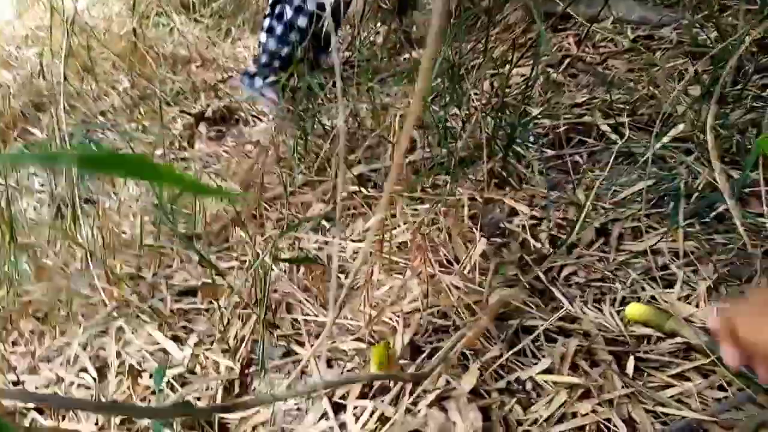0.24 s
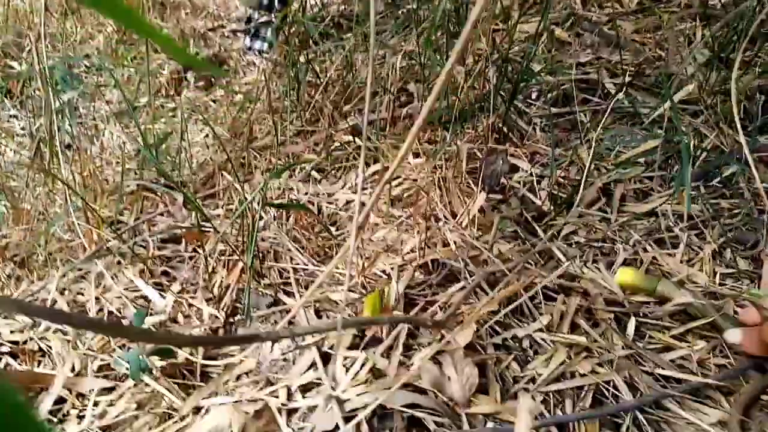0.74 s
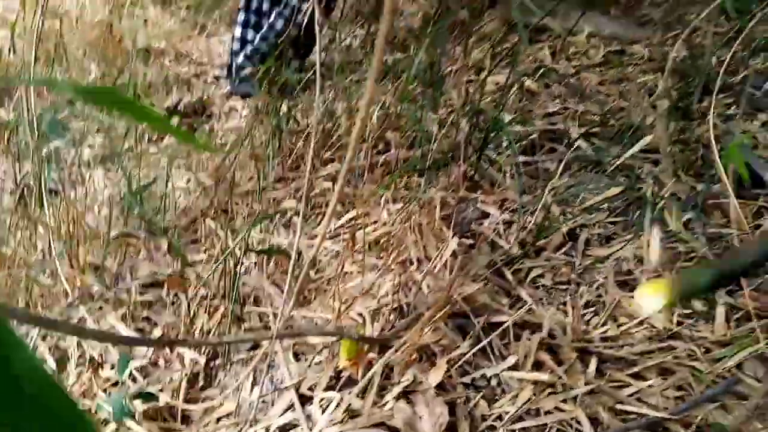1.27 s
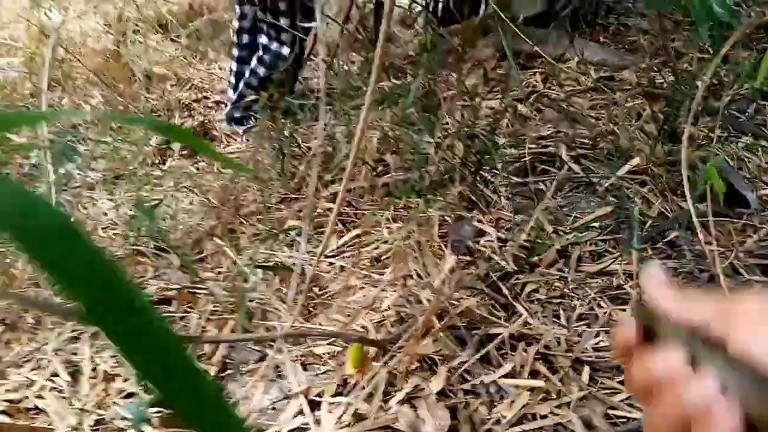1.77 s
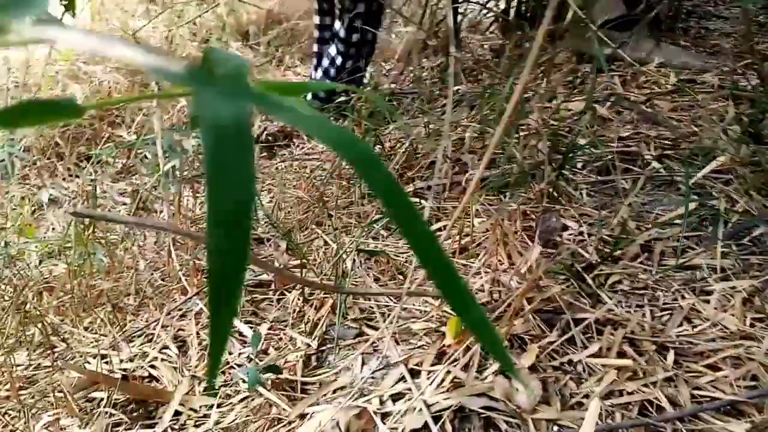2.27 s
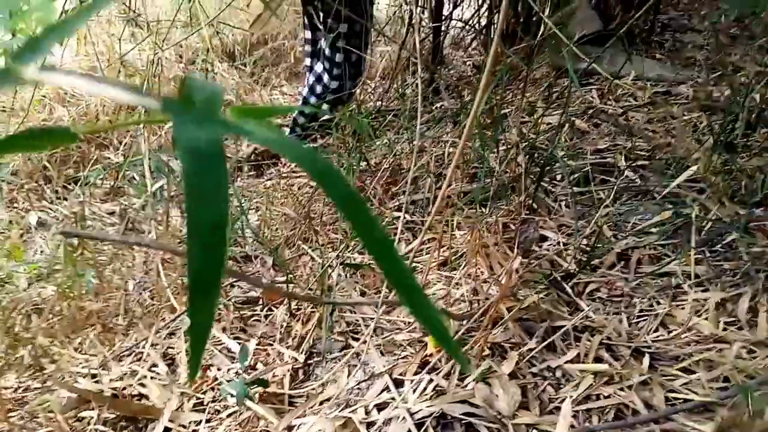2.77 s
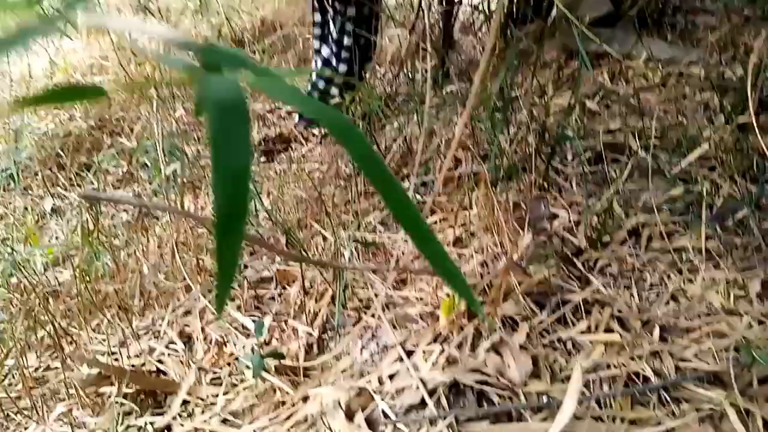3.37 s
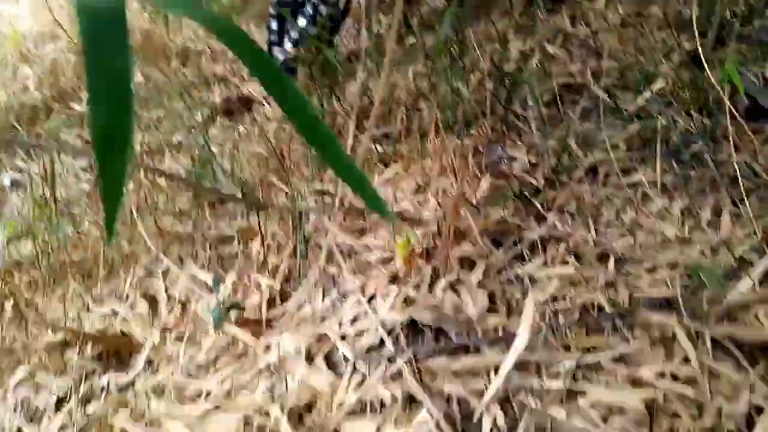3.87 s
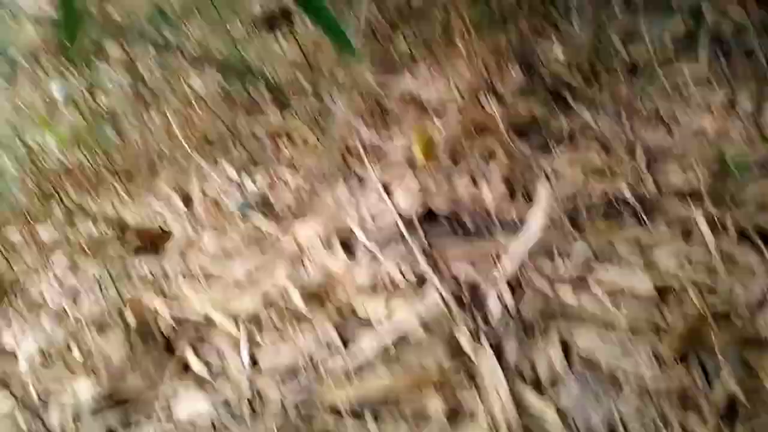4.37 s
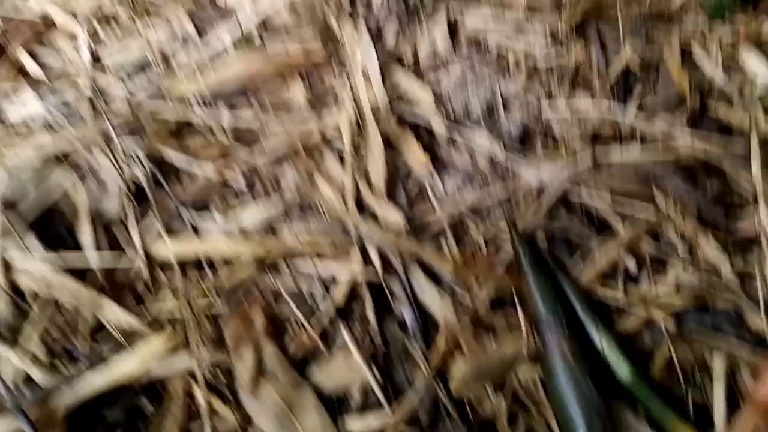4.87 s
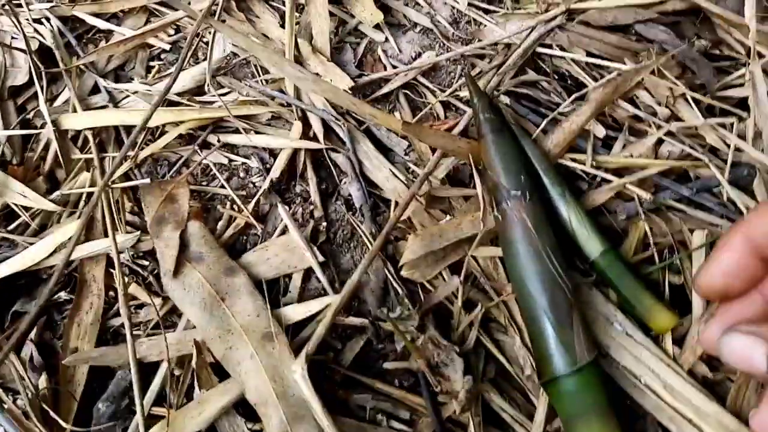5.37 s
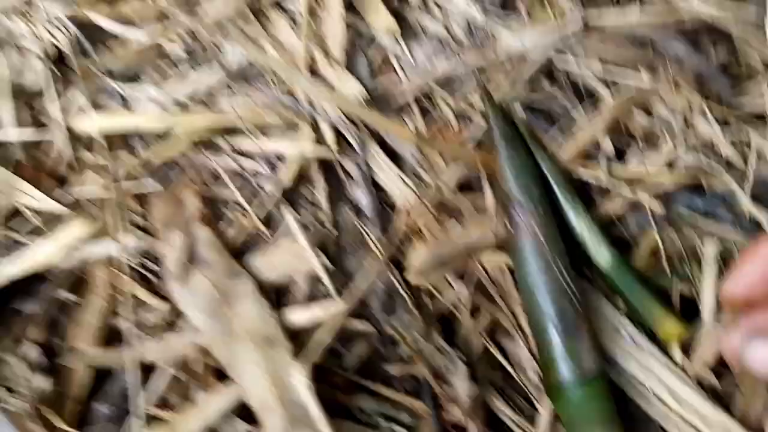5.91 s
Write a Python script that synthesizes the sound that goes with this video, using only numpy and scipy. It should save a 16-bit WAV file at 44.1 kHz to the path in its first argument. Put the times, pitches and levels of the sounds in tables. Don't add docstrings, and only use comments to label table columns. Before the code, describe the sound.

Crisp dry bamboo leaves crackle close by in clumps, with sharp twig snaps, splinter ticks and dull thumps of shifting weight.

```python
import sys
import numpy as np
from scipy import signal
from scipy.fft import rfft, irfft
from scipy.io import wavfile

SR = 44100
rng = np.random.default_rng(int(sys.argv[2]) if len(sys.argv) > 2 else 0)


def boost(x):
    u = np.asarray(x, float) / 20
    return 10 ** u


def dump_mix(stems):
    frames = np.atleast_2d(stems).T
    limited = np.clip(frames, -1, 1)
    pcm = np.round(limited * 32767).astype(np.int16)
    wavfile.write(sys.argv[1], SR, pcm)


N = 270774

RIGHT_LAG_S, LAG_SPREAD_S = 0.000714, 0.00018


def rms_one(x):
    return x / np.sqrt(np.mean(x ** 2) + 1e-20)


def in_time(rows):
    s, *columns = np.transpose(rows)
    return [np.interp(np.arange(N) / SR, s, column) for column in columns]


def at_hz(points, hz):
    table_hz, table_db = np.transpose(points)
    return np.interp(np.log(np.maximum(hz, 1)), np.log(table_hz), table_db)


def drift(rate_hz):
    r = np.exp(-32 * np.pi * rate_hz / SR)
    slow = signal.lfilter([1], [1, -2 * r, r * r], rng.standard_normal(N // 16 + 2002))[2000:]
    return np.interp(np.arange(N) / 16, np.arange(len(slow)), rms_one(slow))


def coloured(x, db_of_hz):
    cepstrum = irfft(db_of_hz(np.arange(2049) * SR / 4096) * np.log(10) / 20)
    cepstrum[1:2048] *= 2
    cepstrum[2049:] = 0
    return signal.fftconvolve(x, irfft(np.exp(rfft(cepstrum))))[:N]


def resonate(x, hz, width_hz):
    r = np.exp(-np.pi * width_hz / SR)
    zeros = np.array([1, 0, -1]) * (1 - r * r) / 2
    poles = [1, -2 * r * np.cos(2 * np.pi * hz / SR), r * r]
    return signal.lfilter(zeros, poles, x + 1e-18)


def pair(x, lag_s, pan_db=0):
    late = np.interp(np.arange(N) - lag_s * SR, np.arange(N), x)
    return np.array([x * boost(pan_db / 2), late * boost(-pan_db / 2)])


def through_ports(sides, spectrum):
    # frequency in Hz, left-right in dB.
    tilt = [(60, 0.5), (110, 9.5), (200, 6), (380, 11), (700, 13), (1290, 4), (2380, 4), (4400, 2),
            (8120, -3.5), (15000, -24.5)]
    return np.array([coloured(side, lambda hz: at_hz(spectrum, hz) + sign * at_hz(tilt, hz))
                     for side, sign in zip(sides, (0.5, -0.5))])


def swell(peak_s, rise_s, fall_s):
    curve = 1.67
    steps = np.arange(0, N + 32, 32)
    since = steps / SR - peak_s
    span_s = np.where(since < 0, max(rise_s, 0.004), max(fall_s, 0.004))
    return np.interp(np.arange(N), steps, np.exp(-2 * np.abs(since / span_s) ** curve))


def movement():
    # time in seconds, crisp leaves in dB,
    # broad sheaths in dB re leaves, left-right in dB.
    stir = [(0.0, -29, 0, -0.5), (0.42, -33, -6, 2.2), (0.66, -35.0, -15, 1.5), (1.277, -30.5, -31, 2.5),
            (1.31, -34.5, -24, 1.5), (1.615, -34, -3.5, 3.5), (2.26, -38.5, -11, 1), (2.861, -30.5, -7, 1),
            (2.948, -43, -13, 1.5), (3.269, -39, -5.5, -2), (3.52, -30, -5, 1.7), (4.081, -33.5, -11, 1.4),
            (4.687, -33, -4, 0.5), (4.718, -39.5, -10.5, 1), (5.296, -38, -18, 1.5), (5.32, -42, -13, 2),
            (5.616, -59.5, -5, 6), (6.14, -33, -5, 1.5)]
    # peak, rise and fall in seconds, crisp leaves in dB,
    # broad sheaths in dB re leaves.
    pushes = [(.18, 0.043, 0.048, -31, 1), (.523, 0.026, 0.095, -31.5, -2.5),
              (.76, 0.043, 0.045, -27.5, -8), (.89, 0.065, 0.019, -26, -8), (1.003, 0.14, 0.17, -30.5, -3),
              (1.233, 0.059, 0.054, -27, 0), (1.619, 0.028, 0.12, -29, -12),
              (1.701, 0.065, 0.088, -25.5, -4.5), (1.861, .02, 0.063, -32, -5.5),
              (1.916, .011, 0.04, -38, 8), (2.005, 0.032, 0.22, -30.5, -2), (2.345, 0.023, .1, -30.5, -4),
              (2.719, 0.0053, 0.024, -26, -2.5), (3.097, 0.09, 0.011, -48, 2.5),
              (3.292, 0.0084, 0.053, -25, -2), (3.408, 0.016, 0.033, -17, -3.5),
              (3.54, 0.023, 0.017, -25.5, -23), (3.711, 0.045, 0.074, -25.5, -8),
              (4.603, 0.17, 0.01, -31.5, -3), (5.245, 0.12, 0.014, -35, -6),
              (5.454, .026, 0.071, -43.5, -3), (5.766, 0.012, 0.025, -43, -18),
              (5.869, 0.062, 0.037, -37.5, -16), (6.036, 0.13, 0.08, -30, -5)]
    # peak in seconds, crisp leaves in dB.
    flurries = [(.06, -44), (0.297, -29), (1.362, -36), (2.14, -35), (2.39, -44), (2.475, -35.5),
                (2.612, -37.5), (3.034, -53), (3.801, -29.5), (4.13, -36), (4.19, -37.5), (4.24, -40),
                (4.43, -49), (4.51, -50), (4.81, -59), (5.07, -41.5), (5.144, -44), (5.2, -40)]
    # peak and fall in seconds, crisp leaves in dB,
    # broad sheaths in dB re leaves.
    tears = [(.885, 0.01, -37, -12), (.965, 0.016, -27, -12), (1.004, 0.011, -23, -14),
             (1.22, .015, -30, -8), (1.45, .006, -40, -6), (1.687, 0.0057, -32, 2),
             (2.044, 0.017, -23.5, -13), (2.165, 0.019, -30, -20), (2.336, 0.0078, -28.5, -16),
             (2.905, .01, -44, -15), (3.031, .008, -37, -20), (3.093, 0.011, -36, -22),
             (3.158, 0.013, -35, -19), (3.25, 0.024, -34.5, -4), (3.555, .008, -24.5, -14),
             (3.667, 0.0044, -32, -13), (3.703, .008, -28.5, -5), (4.392, 0.0072, -43, -12),
             (4.428, 0.022, -34.5, -16), (4.53, 0.013, -30, -15), (4.578, 0.011, -28, -4),
             (4.608, 0.012, -29, -12), (4.652, .006, -26, -18), (5.01, 0.008, -50, -17),
             (5.46, 0.015, -43, -3), (5.98, 0.011, -43, -11)]
    flurry_rise_s, flurry_fall_s, flurry_sheaths_db = 0.038, 0.026, -4
    tear_rise = 0.41

    moves = [*pushes]
    moves += [(s, flurry_rise_s, flurry_fall_s, db, flurry_sheaths_db) for s, db in flurries]
    moves += [(s, tear_rise * fall_s, fall_s, db, share_db) for s, fall_s, db, share_db in tears]
    stir_db, broad_db, pan_db = in_time(stir)
    crisp, broad = boost(2 * stir_db), boost(2 * (stir_db + broad_db))
    for s, rise_s, fall_s, level_db, share_db in moves:
        push = boost(2 * level_db) * swell(s, rise_s, fall_s)
        crisp = crisp + push
        broad = broad + boost(2 * share_db) * push
    return np.sqrt(crisp), np.sqrt(broad), pan_db


def crackle(low_hz, high_hz, per_s, spread_db, clump_db, sharp, patchy_db, count=14):
    sizes = boost(spread_db * np.minimum(rng.exponential(1, N), 5)) * rng.standard_normal(N)
    born = rng.random(N) < per_s * boost(clump_db * drift(50)) / SR
    dealt = rng.integers(0, count, N)
    out = 0
    for k, hz in enumerate(np.geomspace(low_hz, high_hz, count)):
        ringing = resonate(sizes * born * (dealt == k), hz, hz / sharp) * np.sqrt(sharp / hz)
        patches = boost(3.7 * patchy_db * np.tanh(drift(7.8)))
        out = out + pair(ringing * patches, RIGHT_LAG_S + LAG_SPREAD_S * drift(4))
    return rms_one(out)


def litter(crisp_gain, broad_gain, pan_db):
    crisp = crackle(2544, 12500, per_s=9000, spread_db=0.5, clump_db=2.5, sharp=2.45, patchy_db=0.4)
    broad = crackle(1252, 3220, per_s=4000, spread_db=0.0, clump_db=2.0, sharp=9.2, patchy_db=1.5, count=10)
    both = boost(0.58) * crisp_gain * crisp + boost(2.0) * broad_gain * broad
    return boost(pan_db * [[0.5], [-0.5]]) * both


def snaps():
    # time in seconds, peak in dB, note in Hz,
    # woody part in dB re peak, left-right in dB.
    twigs = [(0.0519, -13, 1280, -19, 2), (0.136, -18.5, 1590, -0.5, -1), (.1715, -13, 2570, 3, 2),
             (.9607, -22, 1490, -13, -9), (0.9996, -17.5, 2600, -9, 1), (1.2194, -19.5, 1930, -4.5, 12),
             (1.2694, -26, 2300, -14, -6), (1.9158, -29.5, 2140, 14, 10), (1.9811, -28.5, 2180, 14.5, 8.5),
             (2.0058, -12, 1400, -9, 13), (2.032, -19.5, 3220, -0.5, 4), (2.0874, -14.5, 1870, -14, 6),
             (2.7139, -20, 3000, -21, 1), (3.2833, -25.5, 1770, 0.5, 0), (3.3029, -24, 3660, -5, 0),
             (3.4236, -9, 3300, -27, -2), (3.5942, -12.5, 2010, -11.5, 2), (3.6298, -8, 2530, -2.5, -0.5),
             (3.6655, -17.5, 2670, -16, 6), (4.0227, -12.5, 2700, -7, 2.5), (4.4238, -28.5, 2400, 3, 9),
             (4.5725, -23, 1670, -15, 4), (5.458, -10.5, 2660, -15, 4.5), (6.032, -19.5, 2270, -6, 1)]
    # time in seconds, peak in dB, left-right in dB, ring in Hz.
    leaves = [(0.0373, -21, -3, 6190), (0.1132, -7.5, 4.5, 5370), (0.3678, -20.5, 4, 5700),
              (0.621, -29, 4, 6670), (0.681, -18.5, 9, 6660), (0.7094, -13.5, 10, 7200),
              (0.7457, -12.5, 11, 4820), (0.8785, -17, 6, 4430), (0.891, -15, 4, 6720),
              (1.1595, -10.5, -1, 7310), (1.4334, -23, 8, 6740), (1.6103, -7, 4.5, 7650),
              (1.685, -17, -5, 7450), (1.7094, -19, 0.5, 7290), (2.338, -14, -5, 7250),
              (2.7054, -21, -6, 7650), (3.031, -26, -1.5, 7380), (3.035, -18.5, 4, 7250),
              (3.0867, -20.5, 7, 7290), (3.4077, -6.5, -4, 7460), (3.4585, -11, -4, 6730),
              (3.5994, -16, -2, 7110), (3.8418, -15, 5, 6400), (4.104, -29, -11, 6480),
              (4.2956, -35, -1, 7380), (4.6039, -15, -6, 8000), (4.9007, -25, 1.0, 6570),
              (4.9264, -22, 0, 6630), (4.9826, -22.5, 5, 6380), (5.0075, -36, -1, 6690),
              (5.071, -15.5, 8, 6060), (5.1085, -24, -2, 6860), (5.1422, -15.5, 1, 7130),
              (5.2455, -15, 5, 5110), (5.284, -20, -3, 7760), (5.4191, -30, 1.0, 7040),
              (5.5483, -32, -2.0, 6620), (5.6321, -40, -2.0, 6900), (5.7055, -32, 8, 7050),
              (5.9084, -16.5, 6, 6600), (5.9437, -13.5, -1, 6700), (5.9713, -18, 0.5, 6590),
              (6.1055, -17, 0.5, 6700), (6.1334, -12, -2, 8000)]
    # time in seconds, peak in dB, ring in Hz.
    ticks = [(0.0624, -9, 7310), (0.1844, -18, 5270), (0.3024, -26, 6570), (0.6754, -20, 6680),
             (0.7088, -13, 7290), (1.2344, -16, 6960), (1.2544, -28, 6930), (1.2654, -11, 6920),
             (1.2744, -20, 6520), (1.3644, -14.5, 6620), (1.6264, -22, 7560), (1.7489, -12, 7060),
             (1.9444, -29, 5610), (2.0754, -17, 6600), (2.8104, -15, 6330), (3.6124, -13, 7160),
             (3.6474, -20, 7910), (4.5094, -28, 6650), (4.8314, -24, 6400), (5.0204, -27, 7610),
             (5.1544, -26, 6500), (5.1876, -18, 6590), (5.2194, -24, 7500), (5.2354, -25, 6440),
             (5.2614, -22, 7770), (5.2944, -20, 7030), (5.8664, -29, 6630), (6.0084, -17, 6480),
             (6.0424, -17, 6710)]
    # time in seconds, peak in dB, note in Hz, left-right in dB.
    splits = [(0.0143, -13, 1450, -3), (0.019, -29, 1390, -7), (0.1413, -16, 1430, 9),
              (0.1826, -27, 3400, -2), (1.45, -37, 3120, -9), (2.799, -23, 2950, 4), (3.246, -25, 1330, -2),
              (3.398, -27, 2690, -2.5), (3.4574, -17.5, 1700, 10), (3.6311, -9, 1550, -3),
              (3.6303, -18, 4270, 9), (1.6113, -14, 4890, 17), (3.6996, -23, 2210, -2),
              (4.129, -23, 3400, 9), (4.185, -25, 2680, 1), (4.81, -29, 2070, 12), (5.0345, -29, 3330, 13),
              (5.2028, -20.5, 2500, 6), (5.8356, -39, 3200, 5.5), (6.0671, -23, 2330, -2)]
    crack_hz, crack_ring_db, crack_sharp = 6500, -4, 3.7
    leaf_note_hz, leaf_wood_db, sheath_wood_db = 2900, -32, -9.5

    rows = [(*row, crack_hz) for row in twigs]
    rows += [(s, db - 0.5, leaf_note_hz, leaf_wood_db, pan, hz) for s, db, pan, hz in leaves]
    rows += [(s, db - 6.0, leaf_note_hz, leaf_wood_db, 0, hz) for s, db, hz in ticks]
    rows += [(s, db, hz, sheath_wood_db, pan, crack_hz) for s, db, hz, pan in splits]

    out, t = np.zeros((2, N + 2000)), np.arange(1500) / SR
    bright = signal.butter(2, [2300, 11000], "band", fs=SR, output="sos")
    shape = (np.exp(-t / 0.00051) + 0.17 * np.exp(-t / 0.0033)) * np.minimum(t / 0.00091, 1)
    for s, peak_db, hz, wood_db, pan_db, ring_hz in rows:
        own, shared = np.split(rng.standard_normal((3, 1500)), [2])
        crack = signal.sosfilt(bright, (shared + 0.13 * own) * shape)
        crack = crack + boost(crack_ring_db) * resonate(crack, ring_hz, ring_hz / crack_sharp)
        crack /= np.abs(crack).max(axis=1, keepdims=True)
        note = np.sin(2 * np.pi * hz * t) * np.exp(-t / 0.0019) * np.minimum(t * hz, 1)
        wood = 0.82 * note + 1.67 * resonate(shared[0] * shape, hz, 0.76 * hz)
        right_lag_s = RIGHT_LAG_S + LAG_SPREAD_S * rng.standard_normal()
        for side, (lag_s, sign) in enumerate([(0, 0.5), (right_lag_s, -0.5)]):
            i = round((s + lag_s) * SR)
            level = boost(peak_db + 2.0 + sign * pan_db)
            out[side, i:i + 1500] += level * (crack[side] + boost(wood_db + 9.0) * wood)
    return out[:, :N]


def ground(broad_gain):
    # peak in seconds, fall in seconds, stalks in dB, thump in dB.
    treads = [(0.0, 0.041, -42.5, -46.5), (.137, 0.15, -50.5, -57), (.287, 0.035, -50, -71),
              (.55, 0.036, -57, -59), (.776, 0.038, -47, -66), (.892, 0.047, -53, -62),
              (1.062, 0.11, -54, -72), (1.26, 0.041, -41.5, -59), (1.474, 0.2, -63, -62),
              (1.687, 0.1, -43, -55), (1.815, 0.082, -55, -53), (1.998, 0.16, -50.5, -61),
              (2.14, 0.12, -62, -59), (2.463, 0.017, -56, -71), (2.819, 0.079, -67, -57),
              (3.166, 0.018, -55, -63), (3.305, 0.095, -52, -57), (3.415, 0.021, -30.5, -41.5),
              (4.03, 0.047, -59, -68), (4.346, 0.039, -50.5, -70), (4.45, 0.065, -68, -64),
              (4.53, 0.083, -47, -75), (4.579, 0.012, -43, -60), (4.66, 0.061, -51, -56),
              (4.87, 0.059, -60, -67), (5.24, 0.022, -57, -78), (5.998, .086, -48.5, -62)]
    tread_rise = 0.83
    stalk_bed_db, thump_bed_db = -62.5, -66
    stalks_follow = 0.11

    stalk_power = boost(2 * stalk_bed_db) * (broad_gain / boost(-48.0)) ** (2 * stalks_follow)
    thump_power = boost(2 * thump_bed_db)
    for s, fall_s, stalk_db, thump_db in treads:
        tread = swell(s, tread_rise * fall_s, fall_s)
        stalk_power = stalk_power + boost(2 * stalk_db) * tread
        thump_power = thump_power + boost(2 * thump_db) * tread
    stalks = crackle(500, 1150, per_s=2500, spread_db=1.2, clump_db=1.5, sharp=6.0, patchy_db=2.2, count=7)
    thump = crackle(130, 350, per_s=1200, spread_db=1.2, clump_db=1.2, sharp=4.5, patchy_db=2.2, count=5)
    own = rms_one(resonate(resonate(rng.standard_normal((2, N)), 240, 220), 240, 220))
    low = boost(0.7) * np.sqrt(stalk_power) * stalks
    low = low + boost(-4.0) * np.sqrt(thump_power) * (thump + 1.23 * own)
    return low * boost(np.array([[2.5], [-2.5]]))


def shoot():
    # start in seconds, length in seconds, first note in Hz, last note in Hz, level in dB.
    drags = [(0.196, 0.36, 1150, 1156, -58), (0.862, 0.15, 973, 1547, -54), (1.2, 0.038, 985, 937, -38.5),
             (2.195, 0.38, 1202, 1150, -61.5), (2.794, 0.053, 1040, 1065, -55),
             (3.252, 0.081, 850, 920, -45.5), (3.277, 0.023, 242.8, 169, -44.5),
             (3.303, 0.042, 158.6, 138, -55), (4.379, .13, 350, 262, -58.5), (4.453, 0.24, 716, 1180, -57),
             (4.572, 0.23, 150, 372, -61.5), (5.84, 0.068, 1100, 1160, -64), (5.954, 0.082, 200, 284, -53)]
    arch_db, edge_s = 3, 0.0073
    out, t = 0, np.arange(N) / SR
    for s, length_s, first_hz, last_hz, level_db in drags:
        along = np.clip((t - s) / length_s, 0, 1)
        hz = first_hz + (last_hz - first_hz) * along
        fade = np.clip(np.minimum(along, 1 - along) * length_s / edge_s, 0, 1)
        fade = fade * boost(-arch_db * (2 * along - 1) ** 2)
        tone = np.sin(2 * np.pi * np.cumsum(hz) / SR)
        out = out + fade * boost(level_db + 6.5) * drift(64) * tone
    return pair(out, RIGHT_LAG_S, pan_db=10)


def bird():
    # seconds from its top, pitch in Hz, level in dB re top.
    whistle = [(-.05, 2200, -16), (-.037, 2310, -14), (-.018, 2750, -3), (-.008, 3310, -2), (.005, 3270, 6),
               (.017, 2900, 2), (.03, 2700, -1), (.055, 2550, -10)]
    # top in seconds, level in dB.
    chirps = [
        (5.445, -53),
        (5.85, -55),
    ]
    out, t = 0, np.arange(N) / SR
    for top_s, top_db in chirps:
        rows = np.array(whistle) + [top_s, 0, top_db]
        hz, level_db = in_time(rows)
        fade = np.clip(np.minimum(t - rows[0][0], rows[-1][0] - t) / 0.01, 0, 1)
        tone = np.sin(2 * np.pi * np.cumsum(hz) / SR)
        out = out + fade * boost(level_db + 4.1 * drift(68)) * tone
    return pair(out, RIGHT_LAG_S, pan_db=12)


def grove():
    # frequency in Hz, level in dB per Hz.
    air_spectrum = [(18, -53), (30, -10), (61, -5.5), (154, -8.5), (267, -15.5), (415, -15), (552, -22),
                    (597, -22), (680, -16.5), (978, -29), (7630, -8.5), (9890, -30), (15000, -100)]
    shared, left, right = rng.standard_normal((3, N))
    air = through_ports(pair(0.12 * shared, RIGHT_LAG_S) + [left, right], air_spectrum)
    return boost(-54 + 1.5 + 1.0 * drift(2.6)) * rms_one(air)


def scene():
    # frequency in Hz, level in dB per Hz.
    litter_colour = [(350, -79.5), (600, -19), (930, -11), (1260, -14.5), (1380, -13), (1820, -11.5),
                     (2520, -10), (3550, -8), (7340, 1.5), (7760, 1), (8650, -6.5), (10800, -16.5),
                     (13400, -19), (15000, -7.5), (15800, 2)]
    crisp_gain, broad_gain, pan_db = movement()
    near = through_ports(litter(crisp_gain, broad_gain, pan_db) + snaps(), litter_colour)
    stems = [(0.0075, -22.5), (0.016, -28)]   # (echo delay s, dB)
    echoes = sum(boost(db) * pair(near[0] + near[1], s)[1] for s, db in stems)
    return boost(3.0) * (near + echoes) + ground(broad_gain) + shoot() + bird() + grove()


def top_cut(x):
    return signal.sosfilt(signal.butter(12, 16860, fs=SR, output="sos"), x)


def record(dry):
    cut = signal.sosfilt(signal.cheby2(14, 45, 15800, fs=SR, output="sos"), dry)
    cut = signal.sosfilt(signal.butter(3, 48, "high", fs=SR, output="sos"), cut)
    return top_cut(1.5 * np.tanh(cut / 1.5))


dry = scene()
out = record(dry)
dump_mix(out)
```